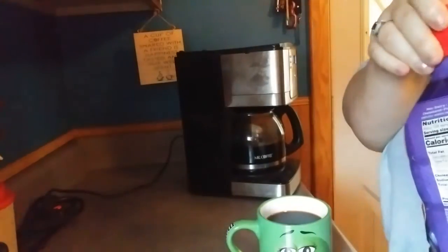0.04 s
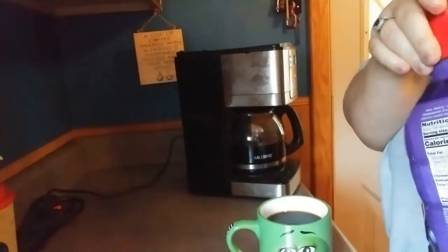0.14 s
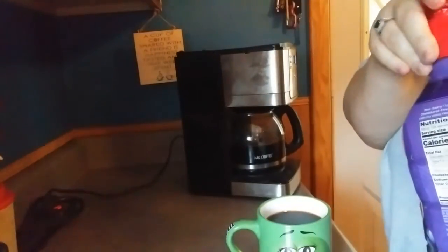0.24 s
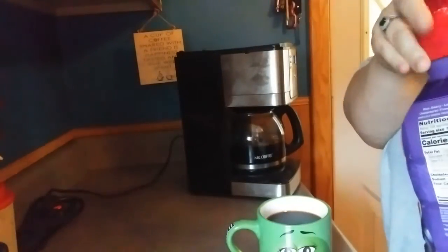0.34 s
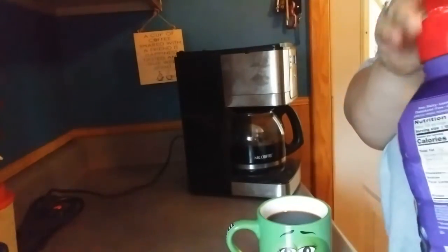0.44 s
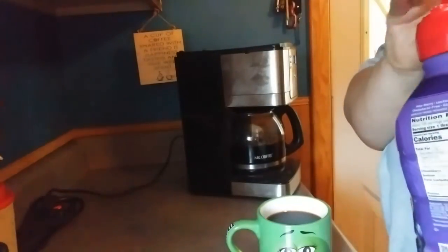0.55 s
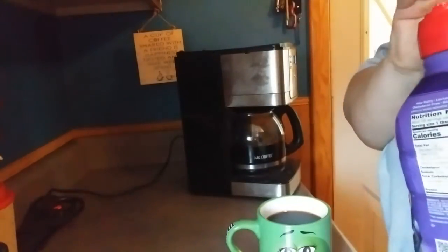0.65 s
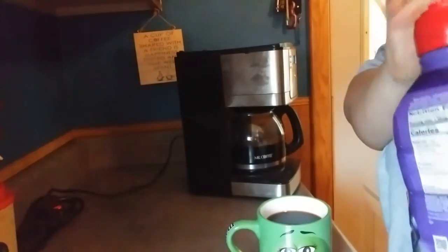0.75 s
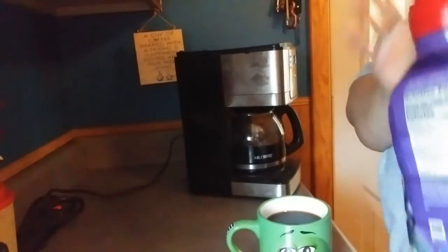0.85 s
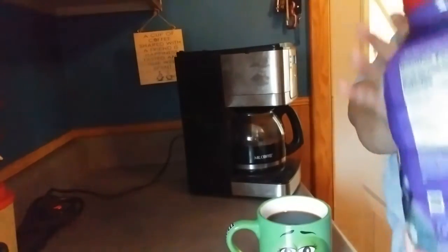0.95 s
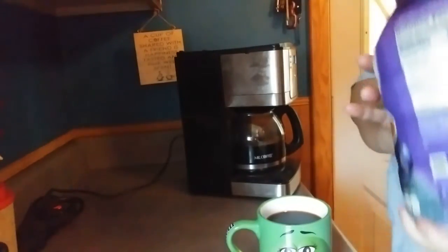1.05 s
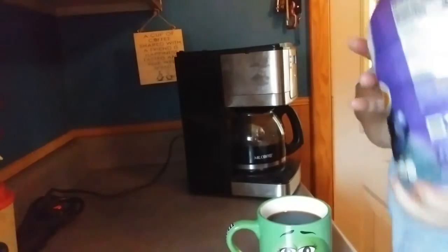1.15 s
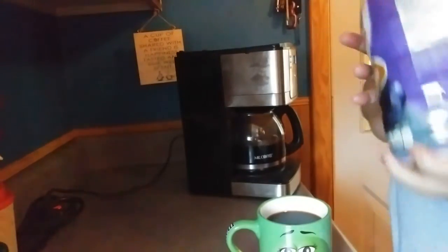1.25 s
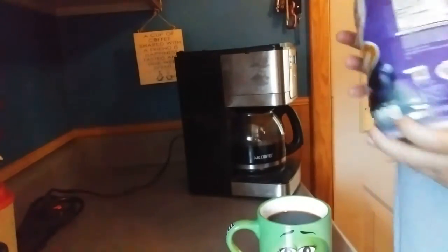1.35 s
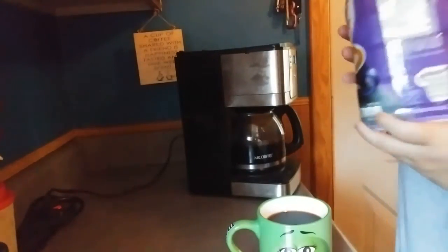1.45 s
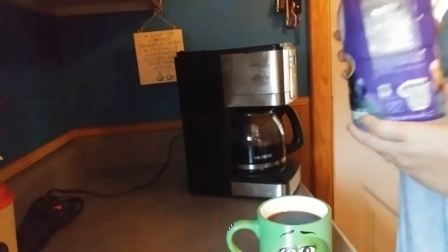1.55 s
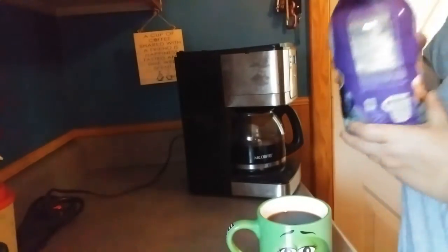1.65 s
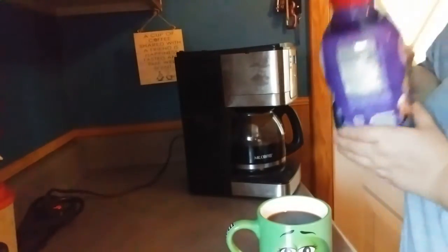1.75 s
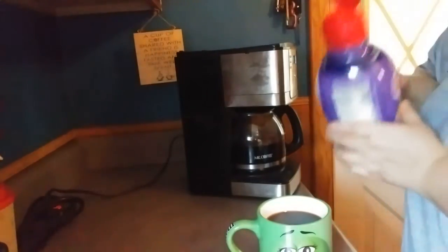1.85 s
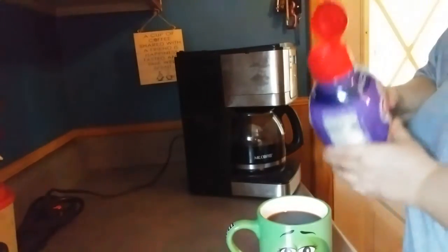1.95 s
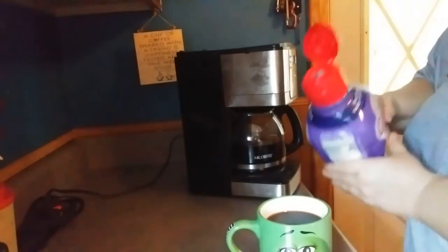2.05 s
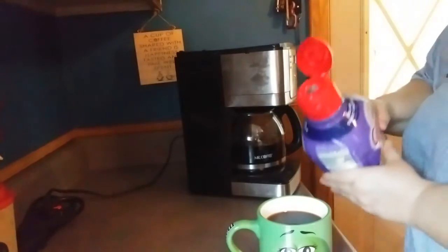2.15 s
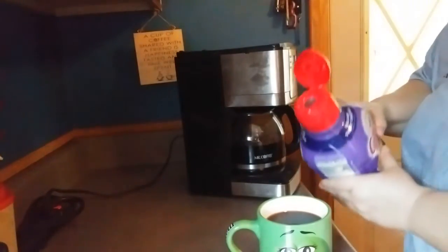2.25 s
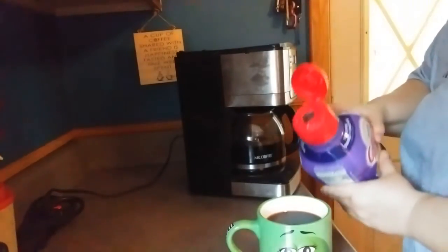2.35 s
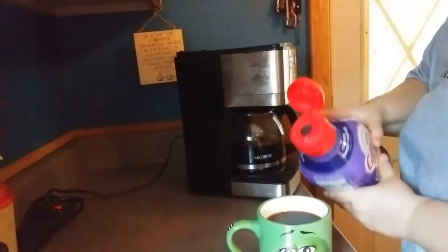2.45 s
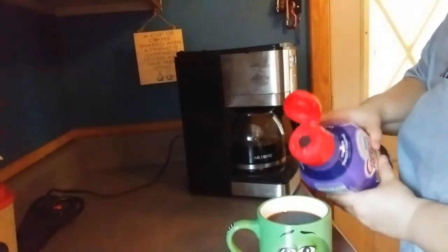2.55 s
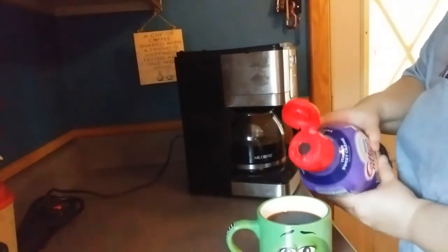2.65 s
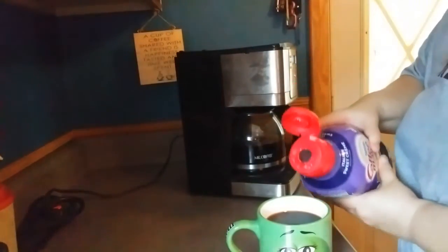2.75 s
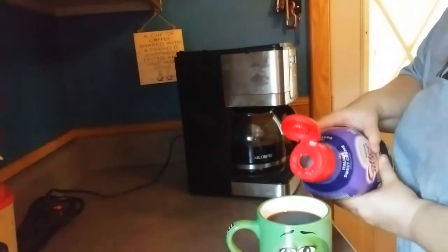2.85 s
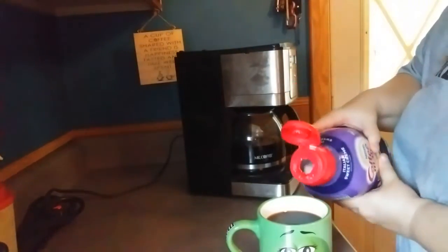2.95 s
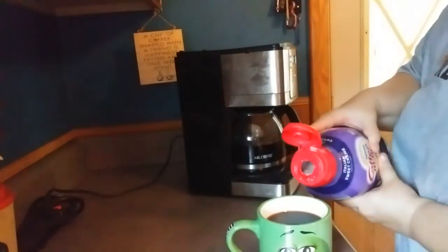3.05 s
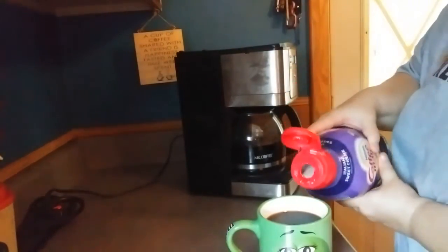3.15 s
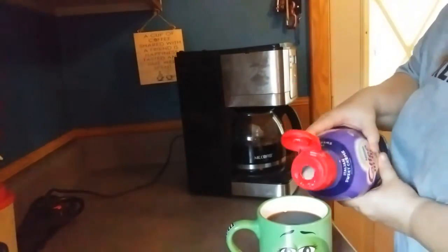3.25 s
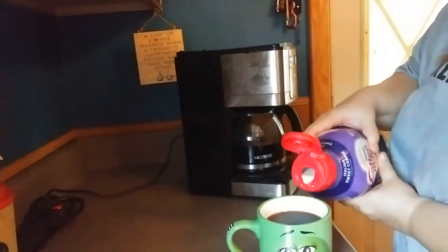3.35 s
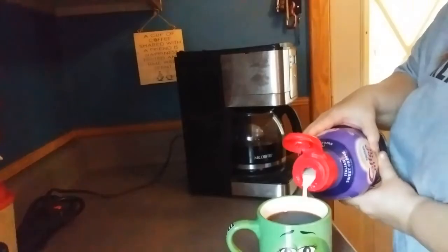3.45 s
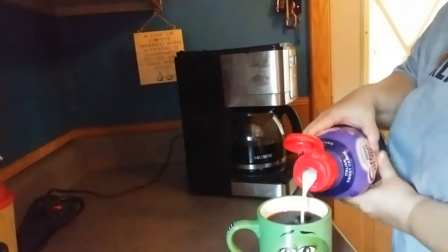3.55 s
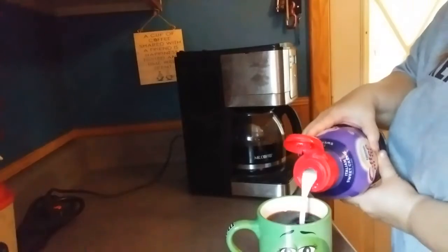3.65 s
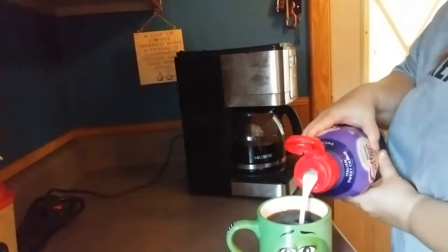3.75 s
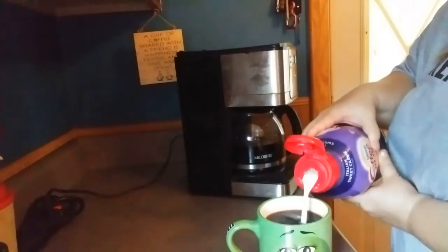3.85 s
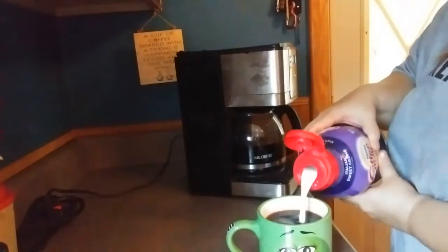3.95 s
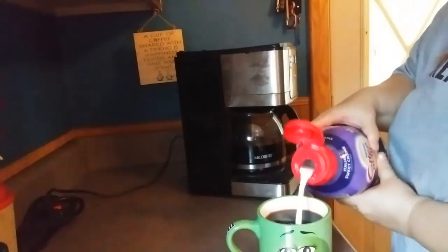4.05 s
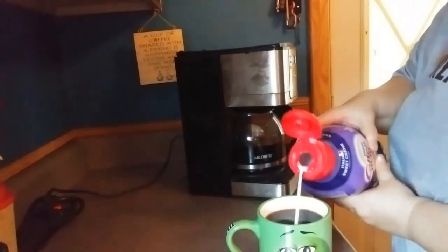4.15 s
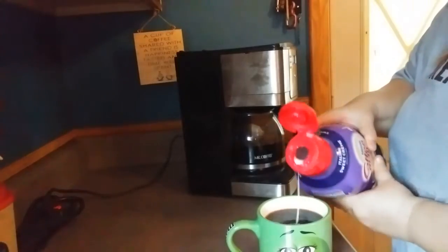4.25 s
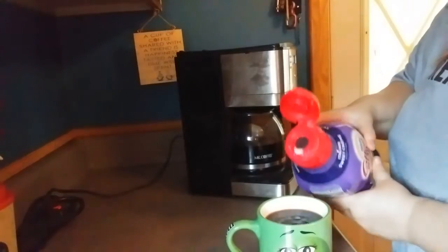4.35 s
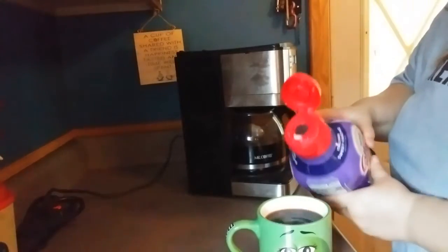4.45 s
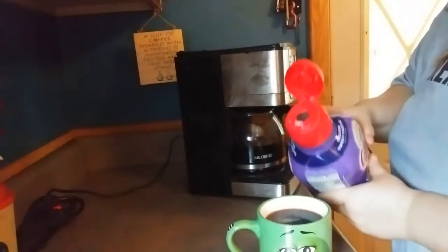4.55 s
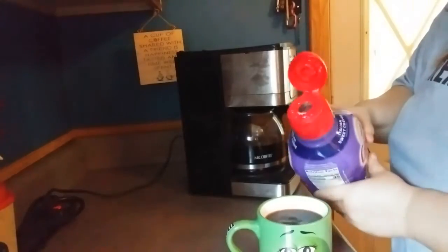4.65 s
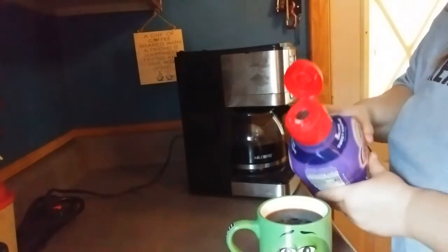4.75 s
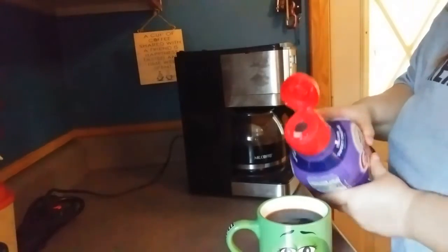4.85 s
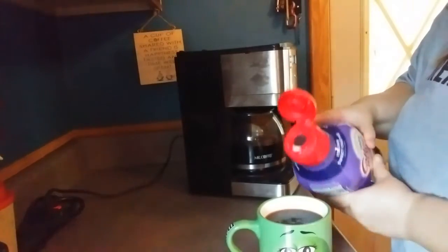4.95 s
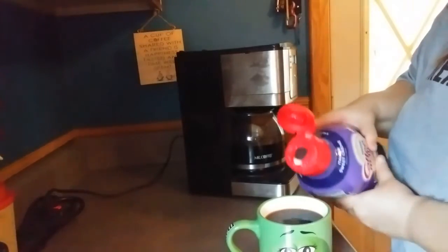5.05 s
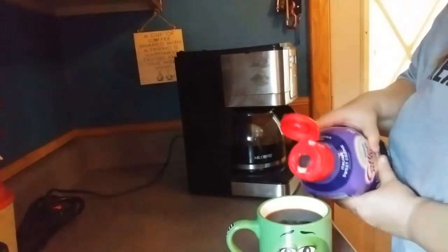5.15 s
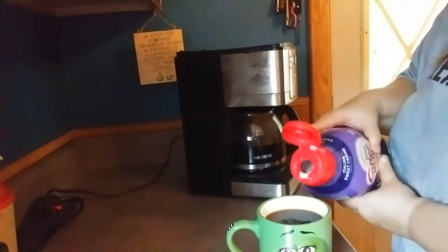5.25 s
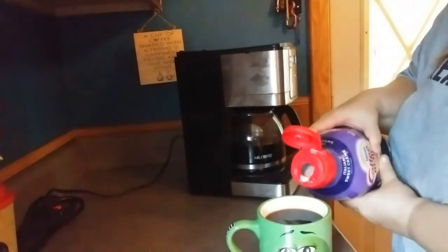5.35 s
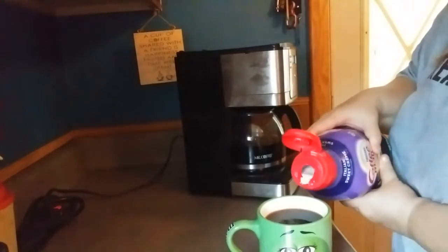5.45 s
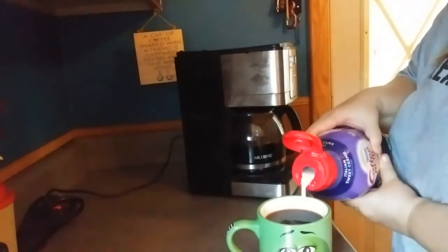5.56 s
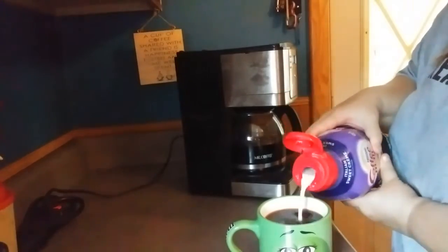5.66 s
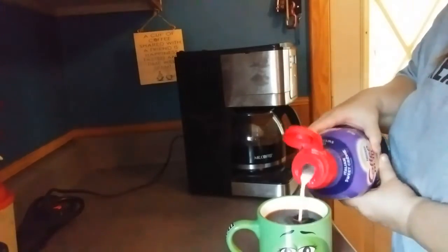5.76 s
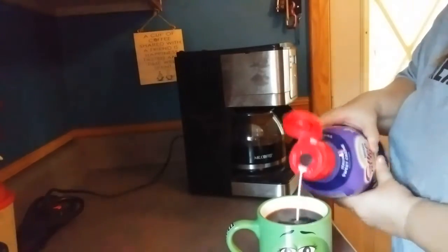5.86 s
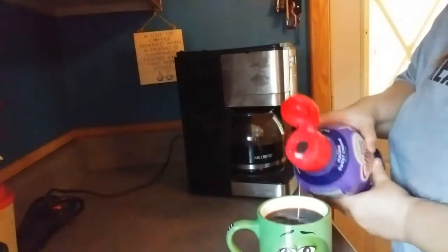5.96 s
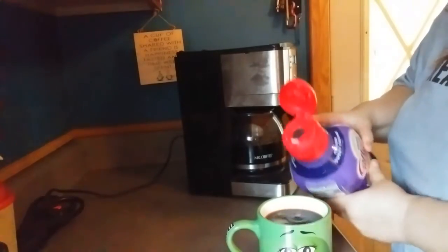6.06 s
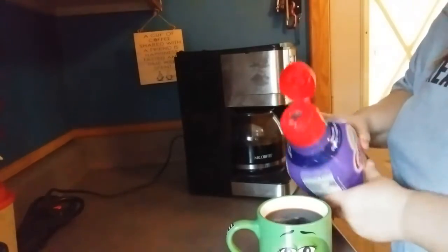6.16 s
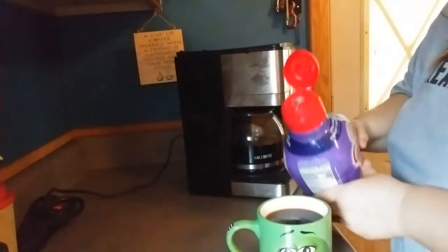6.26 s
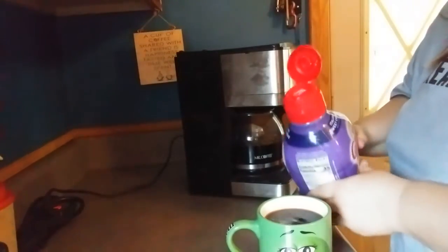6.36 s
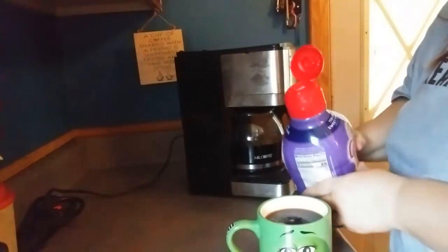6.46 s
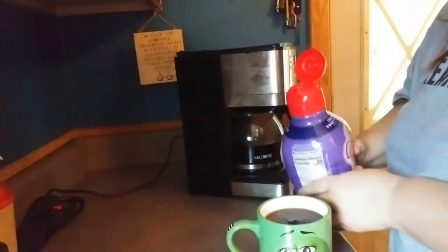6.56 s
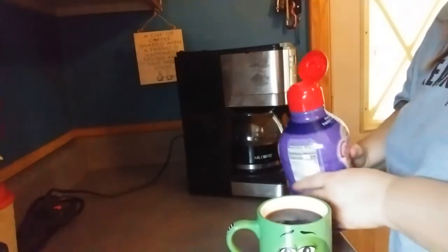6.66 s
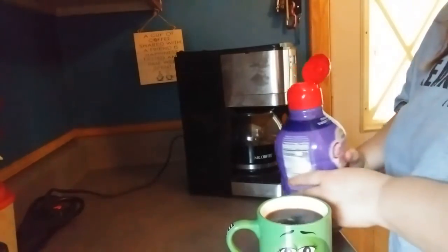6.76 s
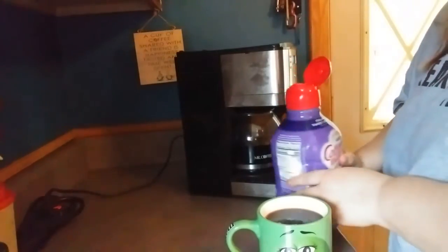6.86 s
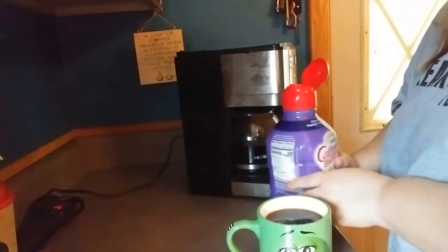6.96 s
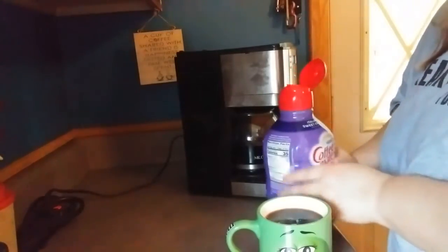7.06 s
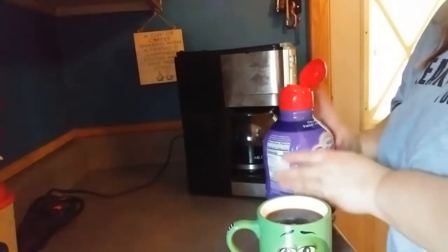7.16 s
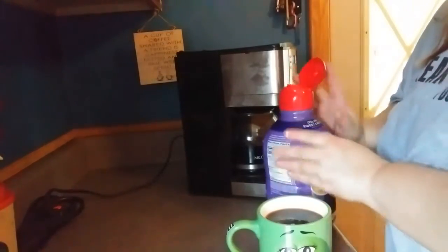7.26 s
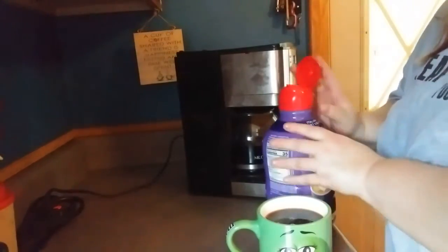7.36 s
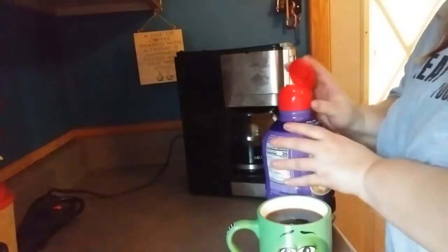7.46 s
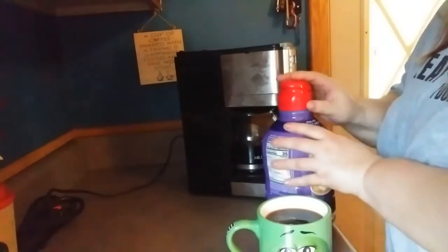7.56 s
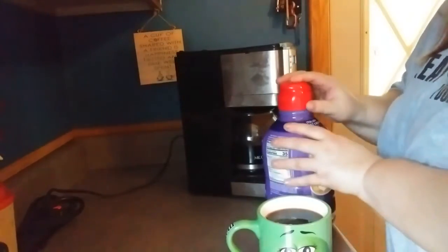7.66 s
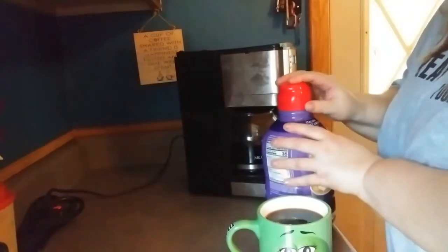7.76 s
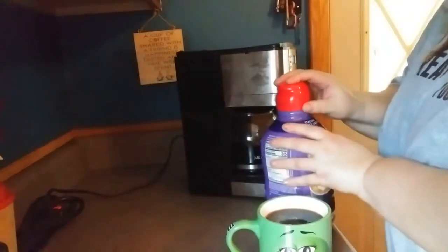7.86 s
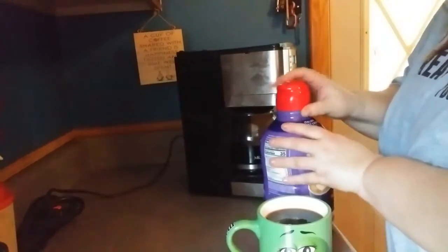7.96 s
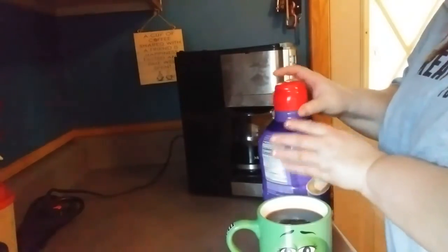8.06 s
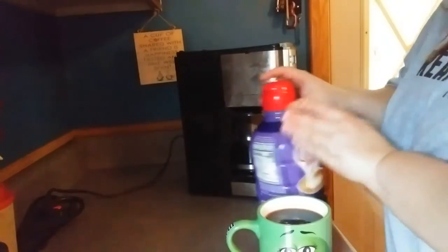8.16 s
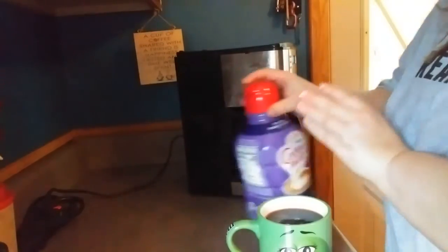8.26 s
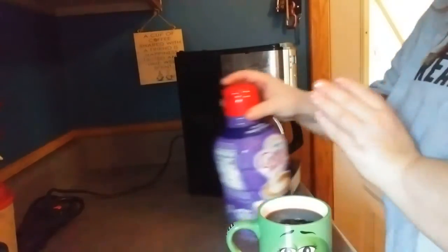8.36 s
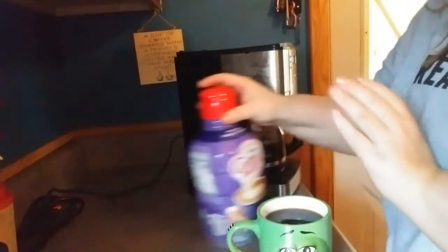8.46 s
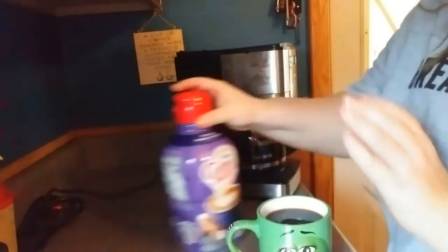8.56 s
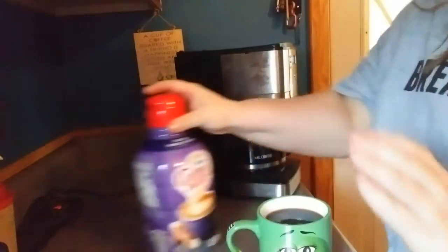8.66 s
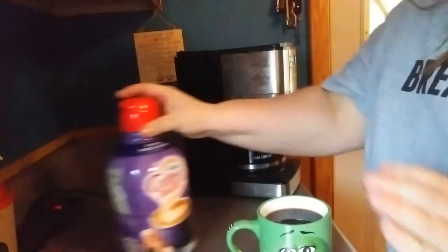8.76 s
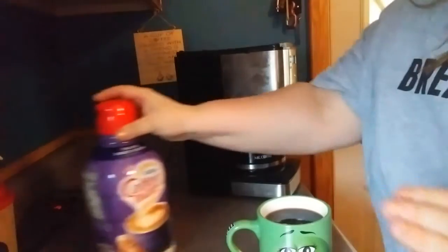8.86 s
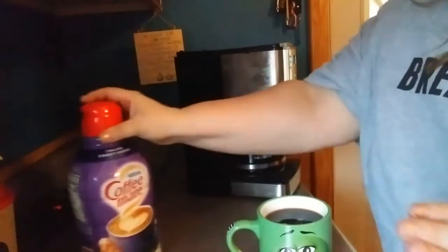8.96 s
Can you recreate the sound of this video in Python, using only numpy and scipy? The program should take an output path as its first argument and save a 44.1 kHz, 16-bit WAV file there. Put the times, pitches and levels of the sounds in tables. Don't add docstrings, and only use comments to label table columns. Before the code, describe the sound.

Close plastic creaks, faint mug pings and tiny drips surround one short glug, before a loud cap snap and soft thuds over steady hiss.

```python
import sys
import numpy as np
from scipy import signal
from scipy.fft import rfft, irfft
from scipy.io import wavfile

SR = 44100
rng = np.random.default_rng(int(sys.argv[2]) if len(sys.argv) > 2 else 0)


def wav_out(sig):
    wavfile.write(sys.argv[1], SR, np.round(np.clip(np.atleast_2d(sig).T, -1, 1) * 32767).astype(np.int16))


def ratio_of_db(decibels):
    return 10 ** (np.asarray(decibels, float) / 20)


N = 397782

# start_s, hold_s, creak level_db, upper modes above that_db
SQUEEZES = [(0.275, 0.14, -39, -10.5), (0.429, 0.023, -43, 0.5), (0.558, 0.12, -45, -11.5),
            (0.938, 0.047, -47.5, 0), (1.037, .02, -55, -18), (1.093, 0.018, -40, -8),
            (1.138, 0.15, -47, -8.5), (4.101, 0.11, -58, 2.5), (4.368, 0.071, -52.5, -6),
            (4.624, 0.099, -45.5, -10), (4.725, 0.067, -46.5, -2), (4.854, 0.062, -39.5, -7),
            (4.956, 0.12, -41, -8), (5.231, 0.079, -52, -9), (5.736, 0.029, -51, -6),
            (5.774, 0.089, -45, -11), (8.672, 0.048, -45.5, -6), (8.757, 0.049, -40.5, -8),
            (8.822, 0.085, -63, -2)]
DROP_RISE_S = 0.0026


def rms_one(x):
    return x / np.sqrt(np.mean(x ** 2) + 1e-20)


def drift(rate):
    r = np.exp(-80 * np.pi * rate / SR)
    slow = signal.lfilter([1], [1, -2 * r, r * r], rng.standard_normal(N // 40 + 2002))[2000:]
    return np.interp(np.arange(N) / 40, np.arange(len(slow)), rms_one(slow))


def ring(clicks, hz, t60):
    r, w = ratio_of_db(-60 / (t60 * SR)), 2 * np.pi * hz / SR
    return signal.lfilter([0, np.sin(w)], [1, -2 * r * np.cos(w), r * r], clicks + 1e-18)


def coloured(spectrum):
    hz, db = np.transpose(spectrum)
    grid = np.log(np.fft.rfftfreq(N, 1 / SR) + 1)
    return rms_one(irfft(rfft(rng.standard_normal(N)) * ratio_of_db(np.interp(grid, np.log(hz), db)), N))


def filtered(x, order, cut_hz, kind):
    return signal.sosfilt(signal.butter(order, cut_hz, kind, fs=SR, output="sos"), x)


def strike(times, levels_db, modes, spread_db, soft_hz, smear_s=0):
    out = np.zeros(N)
    luck = rng.standard_normal((len(times), len(modes), 3))
    for k, (hz, db, t60) in enumerate(modes):
        clicks = np.zeros(N)
        at = ((np.asarray(times) + smear_s * np.abs(luck[:, k, 2])) * SR).astype(int)
        strength = ratio_of_db(levels_db + db + spread_db * luck[:, k, 0])
        np.add.at(clicks, at, strength * np.sign(luck[:, k, 1]))
        out += ring(clicks, hz, t60)
    return signal.lfilter(*signal.butter(2, soft_hz, fs=SR), out)


def air():
    # time_s, level_db
    motion = [(0.0, -51), (0.2, -52), (0.36, -48), (0.6, -50), (1.0, -53.5), (1.21, -51), (1.58, -55.5),
              (1.81, -54), (2.71, -56.5), (4.12, -56), (4.47, -57.5), (4.8, -52), (5.38, -56.5), (5.7, -55),
              (6.08, -57.5), (8.4, -56.5), (8.8, -48), (9.02, -53)]
    # freq_hz, density_db
    air_colour = [(53, -61), (90, -33), (231, -10), (284, -1.5), (487, -1.5), (583, 0.5), (1010, -2),
                  (1120, -3), (1730, -5), (1900, -5.5), (3200, -6.5), (4160, -46), (7040, -120)]
    # freq_hz, density_db
    hiss_colour = [(1530, -42), (2600, -14), (3630, -4), (4530, -2.5), (4920, -3.5), (6000, 1.5),
                   (7710, -7), (8380, -11.5), (10400, -18), (15100, -20), (16000, -22)]
    still_hiss_db, still_air_db = -56, -59.5
    high_db = np.interp(np.arange(N) / SR, *np.transpose(motion))
    low_db = still_air_db + 0.73 * (high_db - still_hiss_db)
    low = ratio_of_db(low_db + 1.4 * drift(11)) * coloured(air_colour)
    return low + ratio_of_db(high_db + .5 * drift(12)) * coloured(hiss_colour)


def kitchen(x):
    # freq_hz, t60_s, level_db
    decay = [(200, 0.3, -1), (500, 0.38, -.2), (1000, 0.3, -4), (1700, 0.31, 1.5), (4000, 0.29, -.2),
             (8000, 0.21, -0.5), (14000, 0.09, -1)]
    t, tail = np.arange(SR) / SR, 0
    hz, t60, db = np.transpose(decay)
    for low in 120 * 2 ** np.arange(0, 7, .5):
        fall = np.interp(np.log(low), np.log(hz), t60)
        level_db = np.interp(np.log(1.2 * low), np.log(hz), db)
        noise = filtered(rng.standard_normal(SR), 2, [low, low * np.sqrt(2)], "band")
        tail = tail + noise * ratio_of_db(level_db - 60 * t / fall)
    tail = tail * np.clip((t - .004) / 0.0096, 0, 1)
    return signal.fftconvolve(x, tail / np.sqrt(np.sum(tail ** 2)))[:N]


def rubs():
    # start_s, peak_s, end_s, peak_db
    strokes = [(2.68, 2.782, 2.87, -61.5), (4.25, 4.453, 4.9, -62), (4.85, 5.05, 5.2, -58.5),
               (7.15, 7.3, 7.5, -63.5), (7.7, 7.775, 7.9, -58), (8.46, 8.79, 9.74, -49.5)]
    # freq_hz, density_db
    rub_colour = [(150, -21), (300, 6), (1000, 5.5), (3000, 2.5), (5000, -13)]
    t = np.arange(N) / SR
    stroke = sum(ratio_of_db(db) * np.interp(t, [start, peak, end], [0, 1, 0]) for start, peak, end, db in strokes)
    return stroke * ratio_of_db(2.2 * drift(30)) * coloured(rub_colour)


def knocks():
    # time_s, peak_db
    pushes = [
        (0.19, -65),
        (1.574, -54),
        (3.972, -60),
        (4.73, -67),
        (5.02, -67),
        (5.78, -73),
        (6.63, -60),
        (7.575, -62),
        (7.785, -66),
        (8.71, -62),
    ]
    width_s = 0.0014
    t = np.arange(N) / SR
    return sum(ratio_of_db(db) * np.exp(-((t - s) / width_s) ** 2) for s, db in pushes)


def trickle():
    start, end = (2.4, 4.3)  # start_s, end_s
    drops_per_s, cycles = 40, 26
    out, t = np.zeros(N), np.arange(SR // 10) / SR
    luck = rng.random((120, 3))
    times = start - np.cumsum(np.log(luck[:, 0])) / drops_per_s
    pitches_hz = 600 * 3.3 ** luck[:, 1]
    levels_db = -60 + 9 * luck[:, 2] ** 2
    for s, hz, db in zip(times, pitches_hz, levels_db):
        if s < end:
            shape = ratio_of_db(db - 60 * t * hz / cycles) * np.minimum(t / DROP_RISE_S, 1)
            out[int(s * SR):int(s * SR) + len(t)] += shape * np.sin(2 * np.pi * hz * t)
    return out


def drops():
    # time_s, peak_db, pitch_hz, t60_s
    drop_rings = [(2.698, -49, 1180, .04), (2.719, -46, 1030, .035), (2.835, -52, 1000, .03),
                  (2.981, -51, 1000, .03), (3.01, -52, 1360, .035), (3.012, -53, 1010, .03),
                  (3.148, -52, 1005, .04), (3.367, -51, 1000, .035), (3.428, -47.5, 1010, .044),
                  (3.425, -51, 605, .03), (3.709, -42.5, 1274, 0.049), (3.855, -47.5, 683, .055),
                  (4.093, -52, 1010, .05), (5.427, -45, 1004, .04), (6.025, -50, 1250, .03),
                  (6.0606, -41, 2155, 0.035), (6.0606, -46, 2600, .015), (6.324, -46, 1260, .04),
                  (7.157, -49, 1000, .03), (7.232, -52, 1680, .04), (7.398, -46.5, 950, .03),
                  (8.017, -42.5, 1013, .032), (8.419, -52, 590, 0.05)]
    echo_s, echo_db = 0.047, -16
    out, t = np.zeros(N + SR), np.arange(SR // 4) / SR
    for s, db, hz, t60 in drop_rings:
        shape = np.minimum(t / DROP_RISE_S, 1) * ratio_of_db(-60 * t / t60)
        out[int(s * SR):int(s * SR) + len(t)] += ratio_of_db(db + 2.5) * shape * np.sin(2 * np.pi * hz * t)
    return out[:N] + ratio_of_db(echo_db) * np.roll(out, int(echo_s * SR))[:N]


def pings():
    # time_s, peak_db
    mug_pings = [(0.084, -47), (0.964, -40.5), (1.638, -46), (2.4246, -46), (2.587, -44), (3.3288, -54),
                 (3.549, -54), (8.55, -50.5)]
    # freq_hz, level_db, t60_s
    mug_modes = [
        (1764, -6, 0.14),
        (1792, -7.5, .12),
    ]
    s, db = np.transpose(mug_pings)
    clicks = np.zeros(N)
    clicks[(s * SR).astype(int)] = ratio_of_db(db)
    return sum(ratio_of_db(m) * ring(ring(clicks, hz, 0.011) / 35, hz, t60) for hz, m, t60 in mug_modes)


def glug():
    gulp_s = [
        3.9695,
        3.976,
    ]
    gulp_db = [
        -24,
        -32,
    ]
    # freq_hz, level_db, t60_s
    gulp_modes = [(430, -1.5, 0.046), (670, 3, 0.055), (790, 1.5, 0.059), (960, -1.5, 0.033),
                  (1230, -11, .03), (1450, -14, .04), (2050, -22, 0.056), (2600, -21, .02)]
    gulp = strike(gulp_s, np.array(gulp_db), gulp_modes, spread_db=0.5, soft_hz=2500, smear_s=0.00065)
    return filtered(gulp, 4, 300, "high")


def blows():
    # time_s, shoulder peak_db, then above that belly_db, wall_db, neck_db
    impacts = [(0.18, -34.5, -27, 8, -1), (0.187, -31, -15.5, -16, 3.5), (1.565, -39, -0.5, -3, -18),
               (5.6, -54, -21, -6, -2), (6.624, -37.5, 4, 2, -9.5), (6.854, -63, -5, 5, 3),
               (6.934, -39.5, -3, -7, -21), (7.777, -36.5, -14.5, 1.5, -0.5), (8.182, -53.5, -20, -10.1, 6),
               (8.297, -56, -19, 8, 12), (8.7095, -44.5, -14, -1, 5)]
    # freq_hz, level_db, t60_s
    body = [
        [(247, -2.5, 0.17), (268, -12, 0.19)],
        [(383, -4, 0.043), (458, -1.5, 0.034)],
        [(604, -7.5, 0.04), (680, 1.5, 0.042), (790, -8, 0.035)],
        [(960, -5, 0.029), (1036, 4.5, 0.02), (1310, -6, 0.013)],
    ]
    s, peak_db, belly_db, wall_db, neck_db = np.transpose(impacts)
    out = np.zeros(N)
    for db, modes in zip((belly_db, wall_db, 0, neck_db), body):
        part = strike(s + 0.00075, peak_db + db + 3.0, modes, spread_db=1.0, soft_hz=1520)
        out += filtered(part, 4, 0.62 * modes[0][0], "high")
    return out


def cracks():
    # time_s, peak_db, bright part above that_db, airy part above that_db, fall_s
    crack_times = [(0.1826, -22.5, -2.5, -8.5, 0.0056), (0.191, -46, -8, -6, 0.0067),
                   (1.1443, -40.5, -4, -18.5, 0.015), (1.5648, -52, 2, -2, 0.0087),
                   (1.8894, -56, -4, 10, 0.0071), (1.9926, -44.5, 5.5, 7.5, 0.0056),
                   (3.97, -44, -9, -22, 0.018), (4.7306, -45, -1, -20, 0.0087),
                   (5.1407, -49.5, 5, 2, 0.008), (5.597, -45, 3, -5, 0.0074),
                   (5.6048, -50, 5.5, -14, 0.012), (5.704, -55, 11, -5, 0.006),
                   (6.06, -52, -15, -26, 0.008), (6.6202, -44, -1, -2, 0.019),
                   (6.8556, -49, -5, -11, 0.013), (7.5674, -14.5, -1, -7, 0.005),
                   (7.571, -19.5, -5, -12, 0.0044), (7.763, -43.5, -6, -29, 0.016),
                   (7.7765, -32.5, -3, -20, 0.0066), (8.1806, -43, 3, -1.5, 0.01),
                   (8.2928, -45, 9.5, 1, 0.008), (8.304, -39.5, -14, -8, 0.011),
                   (8.7081, -44, 7.5, 3, 0.0062)]
    # freq_hz, density_db
    crack_colour = [(530, -52), (900, 2), (1080, -3.5), (1450, -3.5), (1850, -1), (2600, -11), (3300, -2),
                    (3640, -5), (5220, -9), (6480, -2), (7140, 0.5), (11100, -16), (16000, -19)]
    # low_hz, high_hz
    bands_hz = [
        (1250, 4240),
        (3500, 5680),
        (7500, 21600),
    ]
    rattle, out, t = coloured(crack_colour), np.zeros(N), np.arange(SR // 4) / SR
    for k, band in enumerate(bands_hz):
        envelope = np.zeros(N)
        for s, peak_db, bright_db, airy_db, fall in crack_times:
            shape = np.minimum(t / 0.001, 1) * np.exp(-t / max(fall, .001))
            level_db = peak_db - 2.5 + (0, bright_db, airy_db)[k]
            envelope[int(s * SR):int(s * SR) + len(t)] += ratio_of_db(level_db) * shape
        out += envelope * rms_one(filtered(rattle, 2, band, "band"))
    return out


def shut():
    contact_s = [
        7.5683,
        7.5722,
    ]
    contact_db = [
        -15,
        -13,
    ]
    # freq_hz, level_db, t60_s
    cap_modes = [(420, -21, 0.053), (560, -18, 0.062), (1020, -0.5, .018), (1505, -13, .07),
                 (1690, -6.5, .02), (1796, -13, .09), (1940, -10, 0.076), (2065, -12.5, 0.067),
                 (2530, -9.5, .03), (3070, -10.5, 0.035), (3230, -6.5, 0.027), (3975, -12.5, .03),
                 (5050, -5.5, 0.021), (5680, -11, .025)]
    snap = strike(contact_s, np.array(contact_db), cap_modes, spread_db=1.5, soft_hz=8000, smear_s=.0007)
    return filtered(snap, 4, 390, "high")


def grip():
    attack_s, release_db_per_s = 0.01, 322
    t, levels = np.arange(N) / SR, np.full((2, N), -120.)
    for s, hold, db, upper_db in SQUEEZES:
        rise = 30 * np.maximum(s + attack_s - t, 0) / attack_s
        shape = db - rise - release_db_per_s * np.maximum(t - s - hold, 0)
        levels = np.maximum(levels, [shape, shape + upper_db])
    return levels


def lesser_slips():
    gap_s, spread_db = .015, 3
    rows = []
    for s, hold, db, upper_db in SQUEEZES:
        luck = rng.standard_normal((14, 4))
        after = np.cumsum(gap_s * np.exp(.4 * luck[:, 0]))
        peak_db = np.where(after < hold, db - 3 + spread_db * luck[:, 1], -150)
        deep_db = spread_db * luck[:, 3]
        high_db = upper_db - 2 + spread_db * luck[:, 2]
        rows += zip(np.minimum(s + after, s + hold), peak_db, deep_db, high_db)
    return rows


def creak():
    # time_s, peak_db, deep modes above that_db, upper modes above that_db
    clear_slips = [(0.287, -38, -4, -13), (0.321, -38, -4, -10), (0.343, -38, -14, -10),
                   (0.375, -33, -9, -11), (0.399, -43, -9, -2), (0.441, -37, -8, -7), (0.567, -42, -1, -6),
                   (0.616, -37, -9, -11), (0.935, -53, 0, 6), (0.965, -43, -4, -1),
                   (1.037, -39.5, -10, -17), (1.096, -37, -6, -10), (1.143, -30, -14, -14),
                   (1.166, -32, -8, -11), (1.188, -35.5, -8, -15), (1.22, -38, -11, -8),
                   (1.234, -35, -11, -4), (1.248, -37.5, -11, -11), (1.264, -41, -3, -8),
                   (1.285, -37, -14, -7), (1.306, -38, -12, -14), (1.341, -38.5, -21, -4),
                   (4.415, -47, -9, -10), (4.624, -43.5, -11, -8), (4.657, -40.5, -7, -11),
                   (4.683, -42, 1, -9), (4.727, -31, -16, -10), (4.795, -42, -12, -8), (4.843, -40, -4, -5),
                   (4.89, -33, -9, -10), (4.904, -34, -6, -11), (4.919, -43, -2, -4), (4.959, -41, -10, -9),
                   (4.984, -39, -9, -6), (5.009, -34.5, -8, -7), (5.039, -37.5, -14, -11),
                   (5.056, -35, -15, -8), (5.733, -43.5, -2, -7.5), (5.776, -39, -8, -15),
                   (5.792, -37.5, -12, -17), (5.819, -44, -5, -10), (8.759, -36, -11, -8),
                   (8.771, -39, -8, -10), (8.798, -41, -15, -3)]
    # freq_hz, level_db, t60_s
    wall_deep = [(167, -31, 0.023), (243.5, -2, 0.061), (302, -6, 0.054), (373.5, -1, 0.066)]
    # freq_hz, level_db, t60_s
    wall_low = [(480, -5, 0.062), (573.2, 2.5, 0.079), (637, -1.5, 0.056), (713, -6.5, 0.019)]
    # freq_hz, level_db, t60_s
    wall_high = [(1030, 3.5, 0.043), (1183, 2.5, 0.026), (1435, 1.5, 0.044), (1772, 1.5, 0.04),
                 (2065, -1.5, 0.058), (2160, -6, 0.034), (2574, -5.5, 0.038)]
    slips_per_s = 1500
    smear_s = .002
    out = np.zeros(N)
    level_db, upper_db = grip()
    clump = ratio_of_db(2.2 * drift(38))
    for modes, db in ((wall_deep + wall_low, level_db - 10.5), (wall_high, upper_db - 4.5)):
        sizes = ratio_of_db(3.3 * np.minimum(rng.exponential(1, N), 4)) * rng.choice([-1, 1], N)
        slips = sizes * (rng.random(N) < slips_per_s / SR) * clump
        dealt = rng.integers(0, len(modes), N)

        def wall(push):
            return sum(ratio_of_db(m) * ring(push * (dealt == k), hz, t60) for k, (hz, m, t60) in enumerate(modes))

        out += wall(slips * ratio_of_db(db) / np.std(wall(slips)))
    s, peak_db, deep_db, rel_db = np.transpose(clear_slips + lesser_slips())
    out += strike(s, peak_db + deep_db - 2.5, wall_deep, spread_db=3.0, soft_hz=1200, smear_s=2 * smear_s)
    out += strike(s, peak_db - 5.0, wall_low, spread_db=2.5, soft_hz=1530, smear_s=smear_s)
    return out + strike(s, peak_db + rel_db - 8.5, wall_high, spread_db=4.5, soft_hz=3450, smear_s=2 * smear_s)


def scene():
    thuds = blows() + glug() + shut()
    snaps = cracks()
    near = creak() + drops() + pings() + trickle()
    to_room = ratio_of_db(-4.5) * thuds + snaps + ratio_of_db(-3.5) * near
    mono = thuds + snaps + near + ratio_of_db(-9) * kitchen(to_room) + air() + rubs()
    return np.array([mono, mono])


def low_pass(x):
    return signal.sosfilt(signal.butter(12, 16820, fs=SR, output="sos"), x)


def record(dry):
    bass_cut_hz, top_hz, rumble_db = 160, 15850, -90.5
    x = filtered(dry, 8, bass_cut_hz, "high")
    rumble = rms_one(signal.lfilter([1], [1, -.97], rng.standard_normal(N)))
    x = x + knocks() + ratio_of_db(rumble_db) * rumble
    x = signal.sosfilt(signal.cheby2(16, 50, top_hz + 250, fs=SR, output="sos"), x)
    return low_pass(x)


dry = scene()
out = record(dry)
wav_out(out)
```